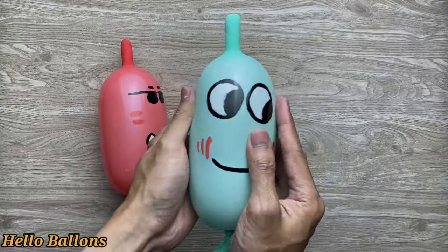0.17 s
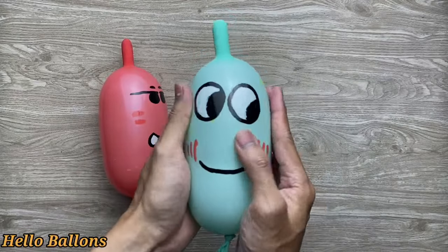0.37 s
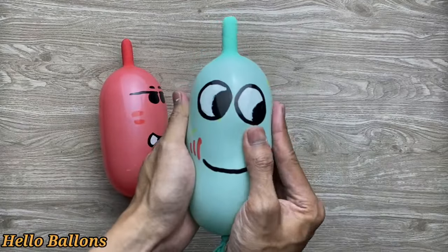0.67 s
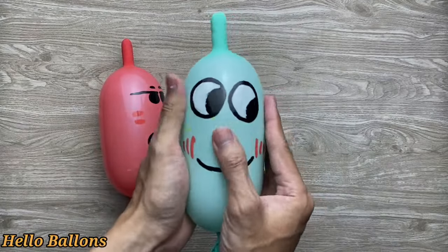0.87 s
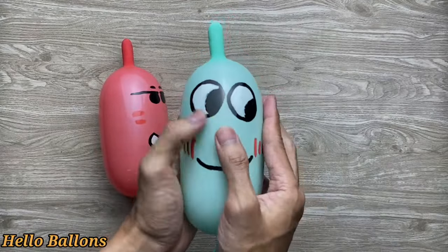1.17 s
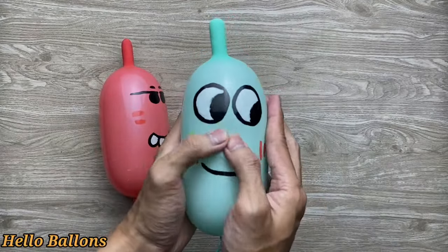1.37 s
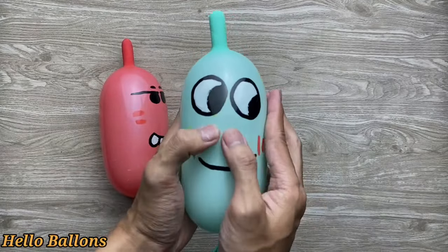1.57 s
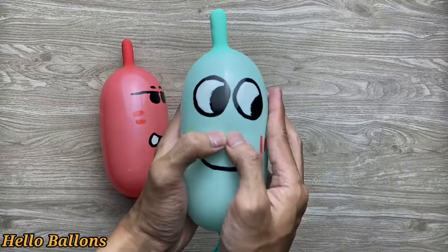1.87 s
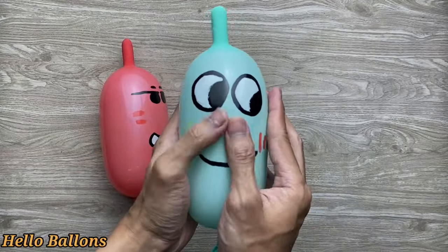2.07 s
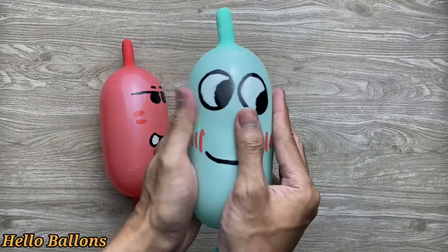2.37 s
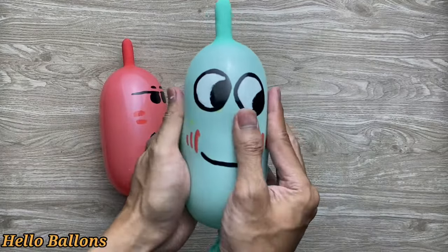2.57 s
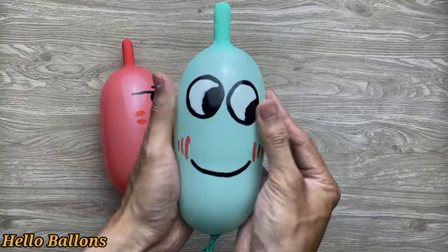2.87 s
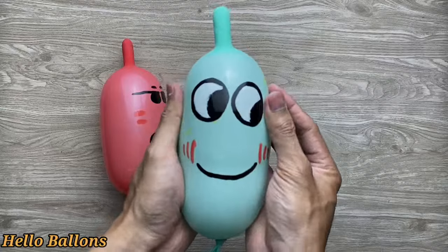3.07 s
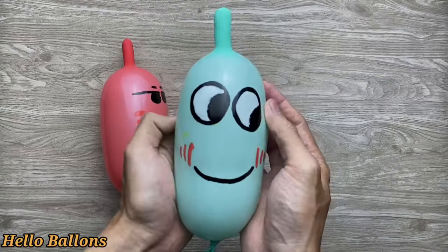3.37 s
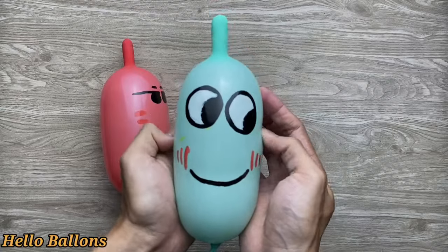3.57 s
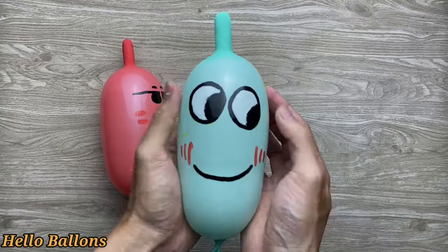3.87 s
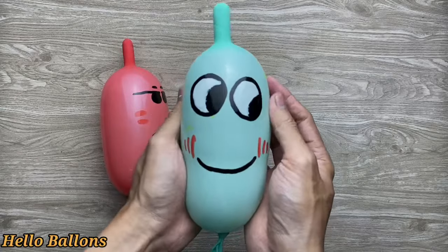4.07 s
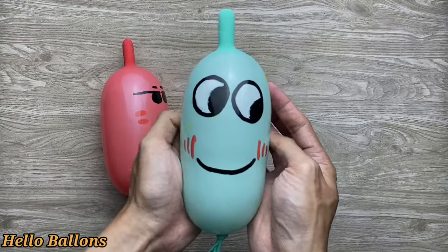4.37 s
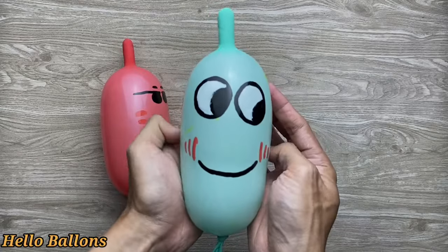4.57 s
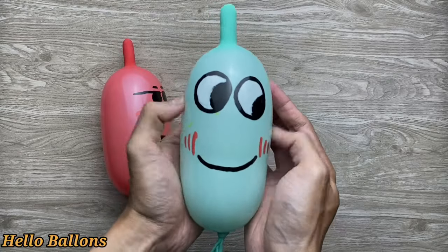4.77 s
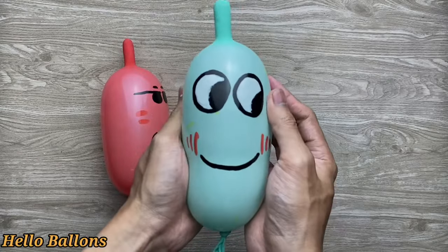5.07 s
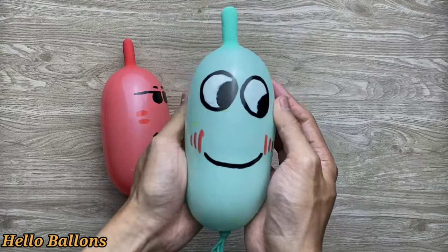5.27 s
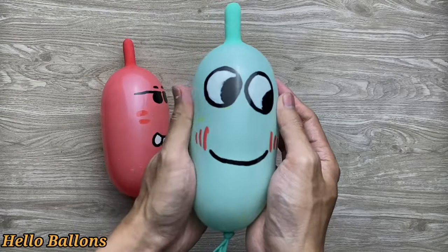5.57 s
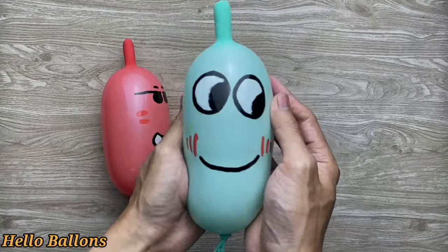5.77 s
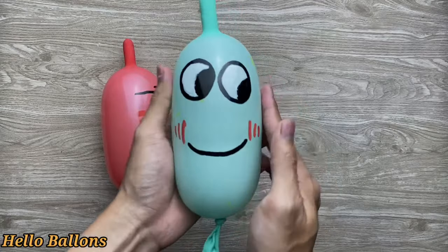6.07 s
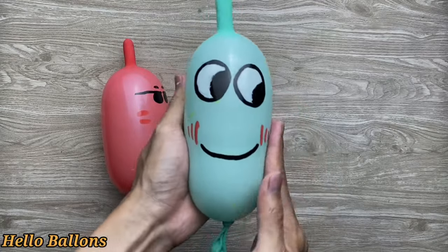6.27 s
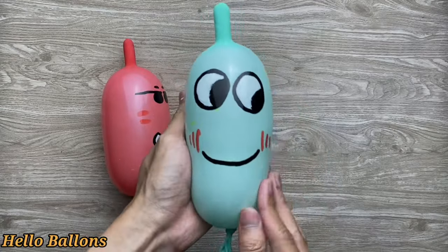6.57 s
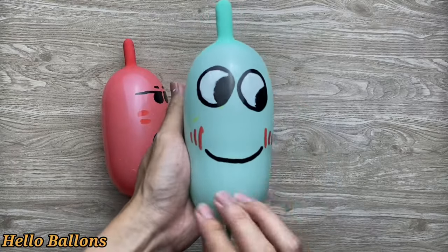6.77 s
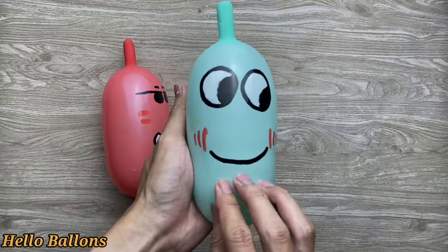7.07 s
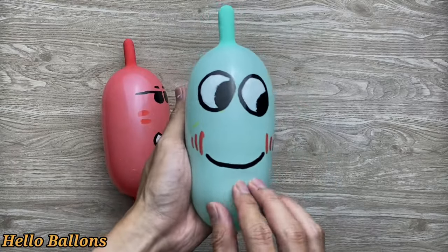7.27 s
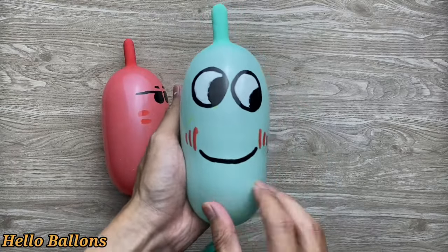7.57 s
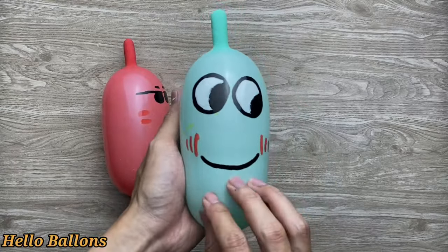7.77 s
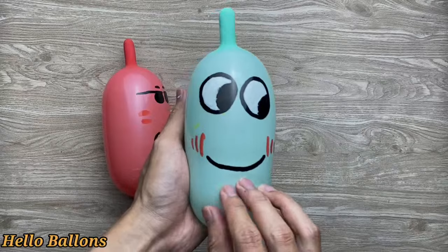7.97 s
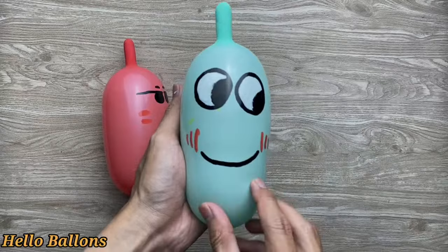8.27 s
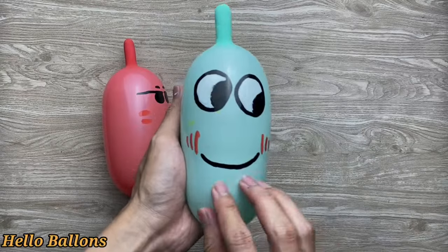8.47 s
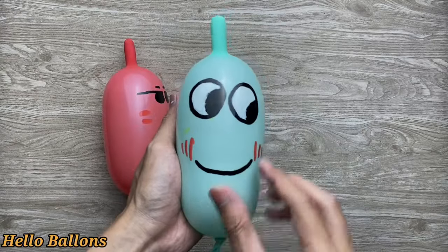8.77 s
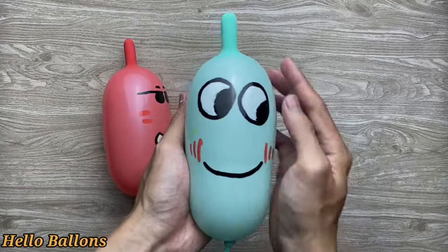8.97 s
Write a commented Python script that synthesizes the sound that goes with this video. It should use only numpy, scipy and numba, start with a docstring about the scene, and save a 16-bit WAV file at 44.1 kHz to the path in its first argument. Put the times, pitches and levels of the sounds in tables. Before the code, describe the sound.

Close, dry squeaks and stuttering rubs of skin on a soft slime-filled balloon, thumping mid-way, then creaking and thinning out over faint room rumble.

```python
"""Two hands squeeze and rub a slime-filled latex balloon on a tabletop, close to a stereo pair, in a small room.
Separate slips open it, each a quickly falling chirp with crackle; strokes between them are streams of tiny slips.
Slips crowd together after two seconds; then a low gulp, even slipping creaks, and one squeal dives near the middle.
The strongest thumping slips follow, then more creaks and a few thin, clean tones, thinning out to a last rub.
Short squeaks are scattered throughout; behind lies filtered noise as a low room rumble, weakest at the end."""
import sys
import numpy as np
from scipy import signal
from scipy.fft import rfft, irfft, next_fast_len
from scipy.io import wavfile
from scipy.ndimage import uniform_filter1d
from numba import njit

SR = 44100
rng = np.random.default_rng(int(sys.argv[2]) if len(sys.argv) > 2 else 0)


def master_out(mix):
    """Clip the mix to full scale and print it as 16-bit PCM to the path in sys.argv[1]."""
    frames = np.transpose(np.atleast_2d(mix))
    ceiling = np.clip(frames, -1, 1)
    pcm = np.round(ceiling * 32767).astype(np.int16)
    wavfile.write(sys.argv[1], SR, pcm)


N = 402633

# Levels of the sources are those before their trims, the balloon and the room.
# The strongest single slips of a finger.
# Each row: time in seconds, body peak in dB, low thump peak in dB, crackle in dB.
FINGER_SLIPS = [(0.001, -13, -34, -37), (0.116, -18, -36, -66), (0.141, -13, -25.5, -52),
                (0.168, -16.5, -23, -47), (0.445, -19, -27.5, -68), (0.504, -9.5, -21.5, -43),
                (0.642, -14, -26.5, -46), (0.79, -31, -45, -55), (0.987, -13.5, -25, -46),
                (0.996, -11, -32, -40.5), (1.029, -14.5, -28, -44.5), (1.38, -28, -46, -52.5),
                (1.919, -17, -36, -40), (1.952, -17, -37, -44), (2.315, -15, -27.5, -45.5),
                (2.385, -11.5, -16.5, -39.5), (2.499, -7.5, -20, -42), (2.527, -11.5, -22, -40.5),
                (2.589, -7.5, -20.5, -40.5), (2.641, -12.5, -40, -34), (2.703, -10, -35, -32),
                (2.792, -19, -36, -46.5), (2.814, -13, -29.5, -36.5), (2.993, -10, -49.5, -60),
                (3.083, -10, -25, -41.5), (3.113, -10, -26, -49), (3.146, -12.5, -29, -46.5),
                (3.195, -17.5, -44, -67), (3.307, -17, -45, -51), (3.323, -21.5, -36, -46.5),
                (3.336, -11.5, -41, -39.5), (3.349, -3.5, -38, -38), (3.367, -9, -35, -44.5),
                (3.399, -7.5, -35.5, -38), (3.409, -15, -29.5, -47), (3.435, -16, -34.5, -41),
                (3.448, -12.5, -36.5, -56), (3.483, -12.5, -36, -46.5), (3.5, -10.5, -32, -41),
                (3.519, -11.5, -37, -49), (3.542, -7, -36, -43), (3.56, -4, -36, -48),
                (3.585, -11.5, -44, -41), (3.603, -8.5, -38, -47), (3.618, -13, -39, -52.5),
                (3.637, -9, -35, -39.5), (3.656, -14.5, -41, -41), (3.683, -10.5, -44, -39),
                (3.971, -19, -23, -59.5), (4.005, -8, -34, -43), (4.027, -9, -34, -49),
                (4.079, -17, -37.5, -49.5), (4.096, -18, -39, -50.5), (4.125, -13.5, -36, -49),
                (4.142, -14.5, -33, -51.5), (4.217, -9, -35.5, -50), (4.234, -11.5, -30, -48),
                (4.261, -17, -42, -57), (4.277, -18.5, -37, -52), (4.303, -12.5, -34, -49.5),
                (4.314, -8, -31, -44), (4.351, -11.5, -38, -56), (4.385, -12.5, -43, -46),
                (4.414, -15, -46, -42), (4.439, -13, -49, -41.5), (4.854, -15, -46, -46),
                (4.927, -15.5, -28.5, -50), (4.953, -10.5, -24, -51), (5.03, -3, -21.5, -42.5),
                (5.058, -9, -25, -48), (5.085, -19.5, -33, -53), (5.373, -28.5, -50, -62),
                (5.526, -14.5, -18.5, -53), (5.557, -21, -19.5, -47.5), (5.646, -2, -16, -40.5),
                (5.679, -5, -20, -40), (5.734, -3.5, -21, -40.5), (5.772, -8.5, -26.5, -44.5),
                (5.881, -18.5, -39, -48), (5.918, -18.5, -40, -51), (6.111, -14.5, -34, -68),
                (6.285, -11, -29, -49), (6.308, -13.5, -33, -60), (6.329, -15, -45, -52),
                (6.352, -25.5, -36.5, -64), (6.37, -12.5, -37, -57.5), (6.39, -9.5, -37.5, -46),
                (6.418, -10.5, -29.5, -42.5), (6.433, -18, -40, -54), (6.456, -11.5, -38, -51),
                (6.584, -10, -33, -42), (6.657, -11, -59, -43), (7.252, -11, -30, -36.5),
                (7.274, -14, -28.5, -49), (7.286, -14, -32, -39), (7.318, -15.5, -29.5, -41),
                (7.386, -13.5, -24.5, -40), (7.872, -15, -35, -43), (7.902, -11.5, -49, -46),
                (7.959, -13.5, -45, -38.5), (8.04, -19, -29, -41), (8.06, -15.5, -36, -46),
                (8.091, -13, -33, -48), (8.594, -15, -28, -39), (8.732, -22, -58, -42)]
# Strokes of skin over latex. Each row: start in seconds, length in seconds, level in dB,
# swell from start to end in dB, grip 0-1, speed 0-1, judder 0-1, fine hiss against rasp in dB.
SKIN_STROKES = [(0.078, 0.18, -39.5, 0, 0.95, 0.52, 0.49, -6.5),
                (0.383, 0.055, -28, 8, 0.89, 0.36, 0.22, -16.5),
                (0.512, 0.061, -43.5, -7.5, 0.9, .5, 0.45, -3), (0.58, 0.021, -28, 0.5, 0.9, 0.32, 0.1, -7),
                (0.638, 0.041, -36, -12.5, 0.98, 0.42, 0.02, -8),
                (0.717, 0.086, -45, 1, 0.97, 0.78, 0.97, -9.5), (0.914, 0.043, -28, 8, 1, 0.37, 0, -13),
                (0.955, 0.14, -38, -2, 0.8, 0.63, 0.27, -8.5), (1.381, 0.051, -29, 17, 0.4, 0.73, 0, -9.5),
                (1.672, 0.024, -23, 0, 0.04, 0.33, 0, -3.5),
                (1.896, 0.032, -31.5, 15.5, 0, 0.74, 0.01, -4.5),
                (2.094, 0.11, -36, 2, 0.2, 0.8, 0.15, -11), (2.232, 0.061, -32, 2.5, 1, 0.45, 0.72, -8),
                (2.378, 0.033, -22, -6, 0.92, 0.29, 0.01, -8),
                (2.606, 0.13, -30, -2, 0.95, 0.62, 0.83, -10),
                (2.828, 0.031, -27, -13.5, 0.4, 0.98, 0.02, -22),
                (2.976, 0.052, -22, 1, 0.8, 0.2, 0.12, -15), (3.027, 0.032, -35, -4, 0.8, 0.65, 0.42, -5),
                (3.08, 0.083, -26, -3.5, 0.75, 0.33, 0.08, -11),
                (3.171, 0.13, -30, 3, 0.3, .35, 0.33, -10.5), (3.337, .12, -32, -4.5, 0.04, 0.46, 0.6, -9),
                (3.498, 0.17, -33, 0, 0.45, 0.6, 0.51, -8.5), (3.69, 0.061, -26.5, 1, 0.5, 0.59, 0.02, -9),
                (3.951, 0.08, -24, -1, 0.76, 0.22, 0.08, -23), (4.041, 0.031, -30, 0, 0.1, 0.4, 0.03, -23),
                (4.332, 0.13, -31, -1, 0.46, 0.5, 0.5, -7.5), (4.487, 0.18, -29, 3.5, 0.41, 0.62, 0.25, -8),
                (4.887, 0.066, -27, 11.5, 1, 0.2, 0.36, -15), (5.061, 0.034, -30, -4.5, 1, 0.4, 0.24, -23),
                (5.111, 0.043, -32.5, 0, 0.1, 0.76, 0.43, -10),
                (5.276, 0.023, -33, 12.5, 0.2, 0.28, 0, -11), (5.342, 0.065, -43, -3.5, 0.7, 0.3, 0.57, -3),
                (5.486, 0.079, -24, 4, 0.63, 0.25, 0.01, -15.5),
                (5.649, .19, -38, -12, 0.97, 0.09, 0.34, -12), (5.872, .1, -39, 0, 0.43, 0.6, .5, -5),
                (6.106, 0.19, -29.5, -1, 0.5, 0.35, 0.15, -5), (6.291, .18, -35, 5.5, 0.6, 0.44, 0.24, 0),
                (6.475, 0.21, -26.5, -2, 0.39, 0.48, 0.44, -4),
                (6.893, 0.081, -34.5, -0.5, 0.3, 0.76, 0.21, -8.5), (7, 0.11, -32, 0.5, 0.2, 0.8, 0.4, -8),
                (7.108, 0.19, -30.5, 2, 0.4, 0.62, 0.3, -6.5), (7.31, 0.11, -31, 7.5, 0.8, 0.51, 0.62, -11),
                (7.422, 0.024, -21.5, -3.5, 0.7, 0.89, 0.17, -10.5),
                (7.456, 0.04, -30.5, -3.5, 0.39, 0.65, 0, -10.5),
                (7.555, 0.14, -50, -13.5, 0.6, 0.67, 0.92, -3),
                (7.75, 0.11, -35.5, 13, 0.17, 0.71, 0.16, -9),
                (7.873, 0.063, -27, -5.5, 0.6, 0.46, 0.28, -7.5),
                (7.988, 0.079, -28.5, -8, 0.5, 0.65, 0.46, -10),
                (8.114, 0.08, -22.5, 0, 0.4, 0.65, 0.16, -14),
                (8.497, 0.14, -26.5, -0.5, 0.6, 0.68, 0.22, -11),
                (8.693, 0.057, -39.5, -6, 0.3, 0.86, 0.82, -10),
                (9.103, 0.036, -29, 5, 0.1, 0.31, 0, -14.5)]
# Light brushes of dry skin, with no grip.
# Each row: middle in seconds, half length in seconds, rasp in dB, fine hiss in dB.
DRY_BRUSHES = [(0.279, 0.033, -54, -62), (1.119, 0.015, -58.5, -43), (2.004, 0.018, -58, -52.5),
               (2.855, 0.028, -53, -49), (3.749, .05, -45.5, -57.5), (4.675, 0.052, -43, -49.5),
               (4.789, 0.046, -47.5, -59), (5.349, .016, -54, -48), (5.389, 0.013, -61, -55),
               (6.098, 0.019, -52, -77), (7.577, 0.023, -48, -57), (8.345, 0.022, -48.5, -64),
               (8.49, 0.013, -43, -66)]
# Voiced creaks, and at 3.963 s a low gulp of the filling. Each row: start in seconds, length in seconds,
# first pitch in Hz, last pitch in Hz, ring in Hz, ring over the fundamental in dB, level in dB.
CREAKS_AND_GULP = [(3.963, 0.05, 156.6, 173.4, 790, -9, -24), (4.498, 0.07, 261.2, 288, 670, 1, -25),
                   (4.571, 0.047, 265.6, 392, 736, 4, -26), (6.131, 0.024, 427.3, 382.1, 777, 11, -13.5),
                   (6.185, 0.1, 419, 325, 730, -6, -27), (6.481, 0.057, 381, 454.8, 852.5, 1, -20),
                   (6.599, 0.07, 296.1, 275.1, 799.3, -20, -26), (7.108, 0.065, 461, 395, 850, 11, -21.5),
                   (7.175, 0.015, 446, 400, 835, 13, -17.5), (7.199, .028, 467, 370, 820, 11, -18.5),
                   (7.955, .022, 399, 452, 860, 11, -19.5), (8.141, 0.072, 454, 383, 814, 15, -19.5),
                   (8.501, 0.037, 477, 381.8, 869.8, 0.5, -21), (8.587, 0.046, 365, 454, 839.5, 8.5, -19)]
# One long squeal under the thumb. Each row: time in seconds, slip rate in Hz, level in dB.
THUMB_SQUEAL = [(4.68, 3096, -38), (4.72, 2990, -39), (4.742, 2015, -37.5), (4.754, 1397, -30),
                (4.766, 848.6, -17), (4.775, 827, -15.5), (4.786, 1068, -25.5), (4.811, 1593, -30),
                (4.819, 1048, -24.5), (4.827, 780, -17.5), (4.831, 700, -31)]
# Short squeaks, and at 4.724 s a high overtone that falls with the long squeal.
# Each row: start in seconds, length in seconds, first pitch in Hz, last pitch in Hz, level in dB.
SHORT_GLIDES = [(0.258, 0.0284, 3160, 2850, -38), (1.07, 0.019615, 661, 1000, -26),
                (2.828, .036, 2070, 2726, -39), (2.831, 0.038, 4311, 5428, -36.5),
                (4.464, 0.0307, 707.3, 489.9, -20.5), (4.647, 0.022, 789, 595.1, -28.5),
                (4.666, 0.031, 1046, 1480, -36), (4.724, 0.033, 6200, 3310, -41.5),
                (5.284, 0.017, 560.1, 1980, -39), (5.932, 0.021, 560.6, 1890, -30),
                (6.051, .02, 1878, 560.3, -49), (6.534, 0.0385, 598.8, 826.9, -18.5),
                (7.551, 0.027, 850, 2410, -37), (8.337, 0.018, 1456, 2741, -39)]
# Thin, clean tones that swell quickly and die away. Each row: time in seconds, pitch in Hz, level in dB, time
# to fall by 60 dB in seconds.
THIN_RINGS = [(0.648, 419, -22, .11), (4.742, 2030, -34, .12), (6.524, 1605, -32.5, .3),
              (6.638, 1620, -28, .12), (7.075, 1620, -30, .1), (7.962, 3293, -44, 0.34),
              (8.617, 1654, -32, .14), (8.729, 3290, -44, 0.15)]
# Resonances of the balloon on the table.
# Each row: centre in Hz, width in Hz, level against the direct sound in dB.
BALLOON_MODES = [(170, 50, -6), (410, 45, -7), (763, 90, -4), (1612, 30, 2), (2730, 68, -6),
                 (3285, 20, 1.5), (3805, 40, -5), (4540, 45, -4), (6196, 30, -6)]
# Colours of the friction: thump of the filling, body of the skin, rasp and fine hiss.
# Each row: frequency in Hz, gain in dB.
THUMP_COLOUR = [(30, -18.5), (70, 0.5), (135, 7), (250, 7), (420, 7), (560, -18), (900, -53)]
BODY_COLOUR = [(200, -40), (450, -5.5), (600, -1), (800, 1.5), (950, -1), (1100, -8), (1350, -12.5),
               (1900, -27.5), (2600, -37), (6000, -63.5)]
RASP_COLOUR = [(900, -72.5), (1620, 11), (2100, 1.5), (3000, 8.5), (4000, -1.5), (6000, -7), (7500, -22),
               (12000, -83.5)]
HISS_COLOUR = [(4000, -15.5), (6500, -7), (9500, -3), (12000, -15), (15000, -12)]
# Phase by which the left microphone leads the right. Each row: frequency in Hz, phase in radians.
MICROPHONE_LEAD = [(0, 0), (700, .65), (1300, .6), (1650, 0), (2200, 1.6), (3300, 2.3), (4500, .6),
                   (6400, 0), (16000, -15.6)]
# Colour of the room rumble. Each row: frequency in Hz, gain in dB.
RUMBLE_COLOUR = [(30, -34), (43, 2.5), (58, -1), (78, 7), (98, -9.5), (125, 3), (195, -13.5), (275, -1),
                 (460, -24), (800, -26), (1500, -45.5), (12000, -64.5)]
# Course of the room rumble. Each row: time in seconds, level in dB.
RUMBLE_COURSE = [(0, -37), (2.4, -37), (5.3, -44), (6.8, -40.5), (7.7, -49), (9.1, -49)]

ATTACK_S, RELEASE_S = 0.009, 0.009  # a stroke takes hold, and lets go
LINGER_DB, LINGER_S = -20, 0.035  # the skin settles after it
FLUTTER_DB, FLUTTER_PER_GRIP_DB = -14.5, 16  # flutter against the stroke: at no grip, and added by a full grip
RASP_DB, RASP_PER_SPEED_DB = -30, 20  # rasp against the stroke: when slow, and added at full speed
JUDDER_HZ, JUDDER_SCATTER, JUDDER_DB = 40.24, 0.16, 18  # catches: typical rate, unevenness, full depth
BRUSH_BODY_DB = -2.5  # body of a brush against its rasp
REST_DB, REST_WANDER_DB, REST_RATE = -67, 6, 22  # resting hands creep: level, spread, changes a second
REST_RASP_DB, REST_HISS_DB = -15, -30.5  # their rasp and hiss against that level
TOP_HZ = 15600  # upper edge of the recorder's band


def slips(turns=1.9, ring_hz=780, ring_width_hz=280, damping=0.72, crack_s=0.0037,
          body_trim_db=-1, thump_trim_db=8, crack_trim_db=0.5,
          lead_s=0.001096, lap_s=0.00682, lap_db=-10, hiss_db=12):
    """Each slip is a falling chirp with a crackle; a firm grip thumps more and damps the ring."""
    out, size = np.zeros(N), 4096
    f, t = freqs(size), np.arange(size) / SR
    chances = rng.standard_normal((len(FINGER_SLIPS), 5))
    for (s, body, thump, crack), chance in zip(FINGER_SLIPS, chances):
        turn_chance, phase_chance, ring_chance, hiss_chance, lap_chance = chance
        # the wave passes once more after a lap around the skin
        lap_delay = lap_s * np.exp(0.146 * lap_chance)
        lap = 1 + undb(lap_db) * np.exp(-2j * np.pi * f * lap_delay)
        wave = dispersion(f, turns * np.exp(0.1505 * turn_chance)) * np.exp(2j * phase_chance) * lap
        grip = np.clip(damping * (thump - body + 14), -0.5, 2)
        ring = resonance(f, ring_hz * np.exp(0.052 * ring_chance), ring_width_hz * np.exp(grip))
        parts = ((shape(BODY_COLOUR, f) * (0.37 + ring), body + body_trim_db),
                 (shape(THUMP_COLOUR, f), thump + thump_trim_db))
        for spectrum, db in parts:
            chirp = irfft(spectrum * wave)
            add(out, s - lead_s, undb(db) * chirp[:size // 2] / np.abs(chirp).max())
        # the harsher the crackle against the body, the more fine hiss it holds
        fine = undb(hiss_db + 0.5 * (crack - body) + 2 * hiss_chance)
        grit = rng.standard_normal(size) * np.exp(-t / crack_s)
        grit = filtered(grit, lambda f: shape(RASP_COLOUR, f) + fine * shape(HISS_COLOUR, f))
        loudness = np.sqrt(np.mean(grit[t < 2 * crack_s] ** 2))
        add(out, s - lead_s, undb(crack + crack_trim_db) * grit / loudness)
    return out


def rubbing(slow_rate=190, fast_rate=560, stretch_db=4, uneven=0.5, scatter_db=3.0, turns=1.4,
            rasp_trim_db=-1, hiss_trim_db=3.5, grit_s=0.00042, smooth=0.3, apart_db=-5):
    """Each stroke is a stream of tiny uneven slips: each chirps through the balloon and lets off a puff of grit."""
    chance = rng.standard_normal((6000, 2))
    body, flutter, rasp, hiss = hands()
    # a slow finger creaks in separate slips; a fast one rasps and packs them densely (rates in slips a second)
    speed = np.clip((rasp - body + 25) / 8, 0, 1)
    travel = np.cumsum(slow_rate * (fast_rate / slow_rate) ** speed) / SR
    at = np.searchsorted(travel, np.cumsum(np.exp(uneven * chance[:, 0])))
    inside = at < N
    pulses = np.bincount(at[inside], undb(scatter_db * chance[inside, 1]), N)
    # puffs of grit over a smooth share
    gate = signal.lfilter([1], [1, -np.exp(-1 / (grit_s * SR))], pulses) + smooth

    def layer(drive, colour, db, window_s=0.042):
        """The hand's push sets the mean power, however the slips happen to fall."""
        x = filtered(drive, lambda f: shape(colour, f) * dispersion(f, turns))
        power = uniform_filter1d(x * x, int(window_s * SR) + 1)
        return x / np.sqrt(np.abs(power) + 1e-3 * power.mean()) * undb(db)

    # the skin's resonance keeps wandering
    skin_hz = 770 * np.exp(0.14 * walk(28, N))
    skin = 0.54 * pulses + moving_mode(pulses, skin_hz, 120.0)
    # fast strokes also wake a higher one
    stretch_hz = 1280 * np.exp(0.23 * walk(28, N))
    skin += undb(stretch_db) * moving_mode(pulses * speed, stretch_hz, 150.0)
    # a firmer grip drags more of the filling along, so it flutters lower
    firmness = np.clip((flutter - body + 11) / 13, 0, 1)
    filling_hz = 360 * (135 / 360) ** firmness * np.exp(0.25 * walk(27, N))
    filling = 0.5 * pulses + moving_mode(pulses, filling_hz, 98.0)
    # grit comes from all over the hands, so it differs between the microphones
    grit = gate * (rng.standard_normal(N) + undb(apart_db) * rng.standard_normal((2, N)))
    return (layer(skin, BODY_COLOUR, body) + layer(filling, THUMP_COLOUR, flutter)
            + layer(grit, RASP_COLOUR, rasp + rasp_trim_db) + layer(grit, HISS_COLOUR, hiss + hiss_trim_db))


def hands():
    """Levels in dB of body, flutter, rasp and hiss as the hands stroke, brush and rest; their powers add."""
    power = np.zeros((4, N))
    chances = rng.standard_normal((len(SKIN_STROKES), 24))
    for (s, length, db, swell, grip, speed, judder, hiss), chance in zip(SKIN_STROKES, chances):
        t = np.arange(int((length + 5 * LINGER_S) * SR)) / SR - ATTACK_S / 2
        after = np.maximum(t - length, 0)
        onset = np.clip(t / ATTACK_S + 0.5, 0, 1)
        fade = np.maximum(np.exp(-after / RELEASE_S), undb(LINGER_DB) * np.exp(-after / LINGER_S))
        # each catch frees the finger at once, and it slows until the next
        catches = np.cumsum(np.r_[0, np.exp(JUDDER_SCATTER * chance)]) / JUDDER_HZ
        cycle = np.interp(np.minimum(t, length), catches, np.arange(len(catches))) % 1
        shudder = uniform_filter1d(undb(-JUDDER_DB * judder * cycle), size=128)
        shudder = shudder / np.sqrt(np.mean(shudder[t < length] ** 2))
        push = onset * fade * shudder * undb(db + swell * (np.clip(t / length, 0, 1) - 0.5))
        flutter = FLUTTER_DB + FLUTTER_PER_GRIP_DB * grip
        rasp = RASP_DB + RASP_PER_SPEED_DB * speed
        for layer, share in zip(power, (0, flutter, rasp, rasp + hiss)):
            add(layer, s - ATTACK_S / 2, (push * undb(share)) ** 2)
    for s, half, rasp, hiss in DRY_BRUSHES:
        # skirts reach twice the half length to each side
        arch = np.hanning(int(4 * half * SR)) ** 2
        for layer, db in ((power[0], rasp + BRUSH_BODY_DB), (power[2], rasp), (power[3], hiss)):
            add(layer, s - 2 * half, arch * undb(db) ** 2)
    shares = undb([[0], [0], [REST_RASP_DB], [REST_HISS_DB]])
    rest = undb(REST_DB + REST_WANDER_DB * walk(REST_RATE, N)) * shares
    return 10 * np.log10(power + rest ** 2)


def creaks_and_gulp(jitter=0.017, shimmer_db=3, fall_db_per_octave=-15, ring_width_hz=330, ring_drift=0.053,
                    trim_db=-2):
    """Voiced creaks and a low gulp of the filling: gliding stacks of overtones through a drifting resonance."""
    out, k = np.zeros(N), np.arange(1, 13)[:, None]
    for s, length, first, last, ring_hz, ring_db, db in CREAKS_AND_GULP:
        size = int(length * SR)
        hz = np.geomspace(first, last, size) * (1 + jitter * walk(293, size))
        ring = resonance(k * hz, ring_hz * np.exp(ring_drift * walk(40, size)), ring_width_hz) ** 2
        gain = undb(fall_db_per_octave * np.log2(k)) + undb(ring_db) * ring
        turning = np.exp(2j * np.pi * k * np.cumsum(hz) / SR)
        tone = np.imag(gain * turning).sum(axis=0)
        tone = unit(tone * undb(shimmer_db * walk(200, size)))
        add(out, s, tone * signal.windows.tukey(size, 0.5) * undb(db + trim_db))
    return out


def squeal_and_squeaks(squeal_trim_db=-4.0, short_trim_db=-2):
    """The long squeal, a high overtone that falls with it, and short squeaks: all wavering, gliding tones."""
    hz, db = curves(THUMB_SQUEAL)
    t = np.arange(N) / SR
    sounding = (t > THUMB_SQUEAL[0][0]) * (t < THUMB_SQUEAL[-1][0])
    out = wavering_tone(hz) * undb(db + squeal_trim_db) * sounding
    for s, length, first, last, db in SHORT_GLIDES:
        size = int(length * SR)
        glide = wavering_tone(np.geomspace(first, last, size))
        add(out, s, glide * signal.windows.tukey(size, 0.5) * undb(db + short_trim_db))
    return out


def wavering_tone(hz, jitter=0.045, shimmer_db=4.5, second_db=-14, fall_db=-8, sharpen_db=7):
    """A tone of wavering pitch and level whose overtones grow as it climbs."""
    phase = 2 * np.pi * np.cumsum(hz * (1 + jitter * walk(500, len(hz)))) / SR
    overtones = sum(undb(second_db + fall_db * k) * np.sin((k + 2) * phase) for k in range(3))
    sharpness = undb(sharpen_db * np.log2(hz / 1500))  # dB an octave, from 1500 Hz
    return unit((np.sin(phase) + sharpness * overtones) * undb(shimmer_db * walk(450, len(hz))))


def thin_rings(attack_s=0.0042):
    """Thin, clean sine tones that swell within milliseconds and die away exponentially."""
    out, t = np.zeros(N), np.arange(SR // 2) / SR
    for s, hz, db, t60 in THIN_RINGS:
        swell = 1 - np.exp(-t / attack_s)
        decay = np.exp(-np.log(1000) * t / t60)
        add(out, s, np.sin(2 * np.pi * hz * t) * swell * decay * undb(db))
    return out


def balloon(x, output_db=-2.0, drift=0.29, touch_db=2.2, touch_rate=14):
    """Friction rings on in modes that squeezing shifts by a share of their width and the place of touch weighs."""
    out = x.copy()
    for hz, width, db in BALLOON_MODES:
        answer = undb(db + touch_db * walk(touch_rate, N))
        centre = hz + drift * width * walk(touch_rate, N)
        out += np.array([moving_mode(channel * answer, centre, float(width)) for channel in x])
    return undb(output_db) * out


def room(x, t60_s=0.34, wet_db=-17, early_s=0.0094, early_db=-12, shift_rate=7, count=4):
    """Two spaced microphones hear the balloon, quick reflections that shift as hands move, and a short room tail."""
    def microphones(f):
        """Half the phase lead and half the level difference go to each side."""
        turn = np.exp(0.5j * np.interp(f, *np.transpose(MICROPHONE_LEAD)))
        lean = shape([(300, 0.0028), (700, 0.27), (1300, 3.672), (8000, 0.026)], f)
        return np.array([turn * lean, 1 / (turn * lean)])

    def echoes(source, envelope):
        """Noise under an envelope serves as a dense spray of echoes."""
        echo = rng.standard_normal(len(envelope)) * envelope
        return signal.oaconvolve(source, echo / np.linalg.norm(echo))[:N]

    t = np.arange(SR // 2) / SR
    tail = np.exp(-np.log(1000) * t / t60_s) * (t > 0.006)
    early = (np.exp(-t / early_s) * (t > 0.001))[:SR // 10]
    out = filtered(x, microphones)
    # the quick reflections are brightest near 2 kHz; early_db comes on top of this colour
    upper = filtered(x, lambda f: shape([(300, 3.9), (900, 0.5), (2000, 15.87), (12000, 0.9)], f))
    # the hands pass from one pose to another, each with its own reflections
    poses = np.array([walk(shift_rate, N) for _ in range(count)])
    poses /= np.linalg.norm(poses, axis=0)
    for k, channel in enumerate(out):
        channel += undb(wet_db) * echoes(x[k], tail)
        channel += undb(early_db) * sum(echoes(upper[k] * pose, early) for pose in poses)
    return out


def rumble(side_db=-16, waver_db=1.0):
    """Low room noise, nearly alike in both channels, that wavers and is weakest at the end."""
    mid, side = (unit(filtered(rng.standard_normal(N), lambda f: shape(RUMBLE_COLOUR, f))) for _ in range(2))
    level = undb(curves(RUMBLE_COURSE)[0] + waver_db * walk(6, N))
    return (mid + undb(side_db) * np.array([side, -side])) * level


@njit
def moving_mode(x, hz, width):
    """A resonance whose centre moves from sample to sample, gain 1 at the centre."""
    y, band, low = np.empty(len(x)), 0., 0.
    for i in range(len(x)):
        g, k = np.tan(np.pi * hz[i] / SR), width / hz[i]
        v = (band + g * (x[i] - low)) / (1 + g * (g + k))
        band, low, y[i] = 2 * v - band, low + 2 * g * v, k * v
    return y


def resonance(f, hz, width):
    """Response of one damped mode, 1 at its centre."""
    return 1 / (1 + 1j * (f * f - hz * hz) / (f * width))


def dispersion(f, turns):
    """Low waves cross the soft balloon slowly: each frequency arrives about so many of its own cycles late."""
    return np.exp(-2j * np.pi * turns * np.log(f + 30))


def walk(rate, size):
    """Random wander with a spread near 1, in straight lines between so many knots a second."""
    knots = rng.standard_normal(int(size / SR * rate) + 2)
    return np.interp(np.arange(size) / SR * rate, np.arange(len(knots)), knots)


def undb(db):
    """Decibels to gain."""
    return 10 ** (np.asarray(db) / 20)


def unit(x):
    """Scale to rms 1."""
    return x / np.sqrt(np.mean(x ** 2))


def curves(table):
    """The columns of a table of timed rows, one value a sample."""
    s, *columns = np.transpose(table)
    return [np.interp(np.arange(N) / SR, np.sort(s), c) for c in columns]


def freqs(size):
    """Frequencies in Hz of the spectrum of so many samples, with 1 in place of 0."""
    return np.maximum(np.arange(size // 2 + 1) * SR / size, 1)


def shape(points, f):
    """Gain of (Hz, dB) points on a log-frequency axis."""
    hz, db = np.transpose(points)
    return undb(np.interp(np.log(f), np.log(hz), db))


def filtered(x, response):
    """Pass x through a response given as a function of frequency."""
    size = next_fast_len(x.shape[-1] + 4096, True)
    return irfft(rfft(x, size) * response(freqs(size)), size)[..., :x.shape[-1]]


def add(out, s, x):
    """Mix x into out from time s."""
    i = max(int(s * SR), 0)
    out[i:i + len(x)] += x[:max(len(out) - i, 0)]


def scene():
    """Friction sounds and gulp pass through balloon and room; the thin rings and the rumble join them directly."""
    handling = slips() + rubbing() + creaks_and_gulp() + squeal_and_squeaks()
    return room(balloon(handling)) + thin_rings() + rumble()


def record(dry):
    """The recorder cuts the top with a steep low-pass."""
    return signal.sosfilt(signal.ellip(8, 0.2, 70, TOP_HZ, fs=SR, output="sos"), dry)


dry = scene()
out = record(dry)
master_out(out)
```